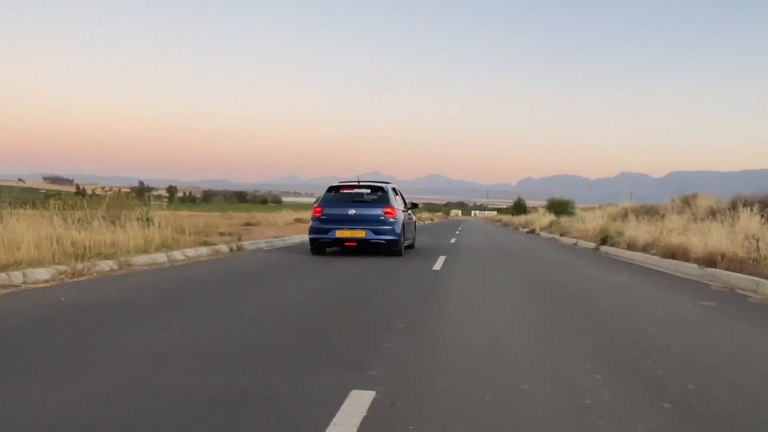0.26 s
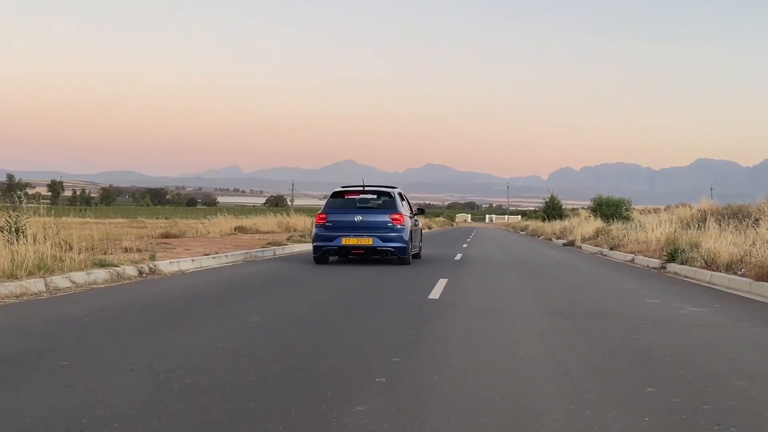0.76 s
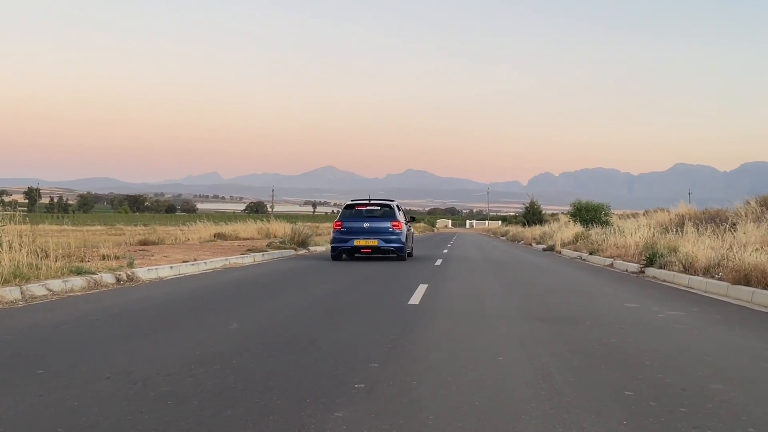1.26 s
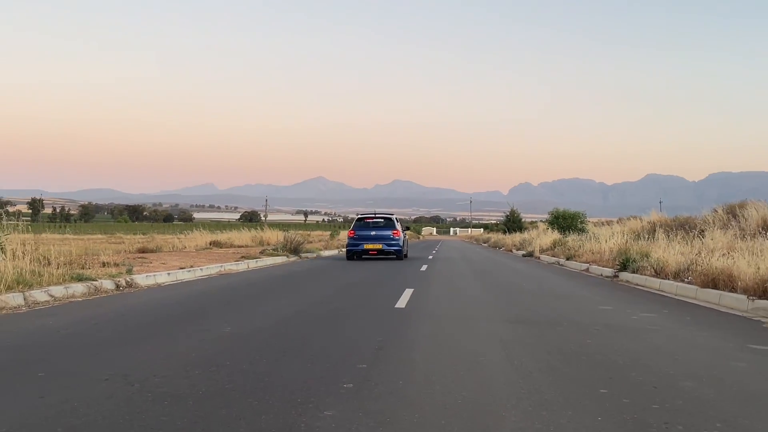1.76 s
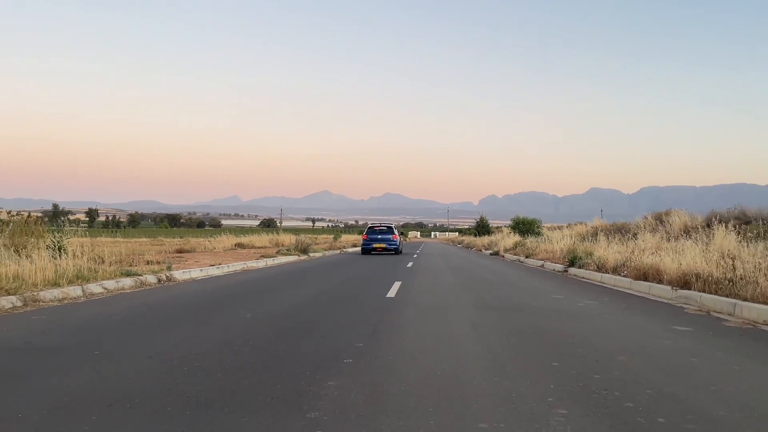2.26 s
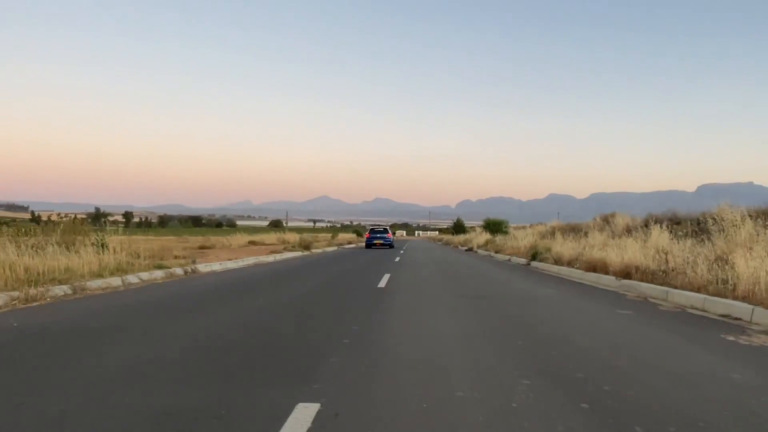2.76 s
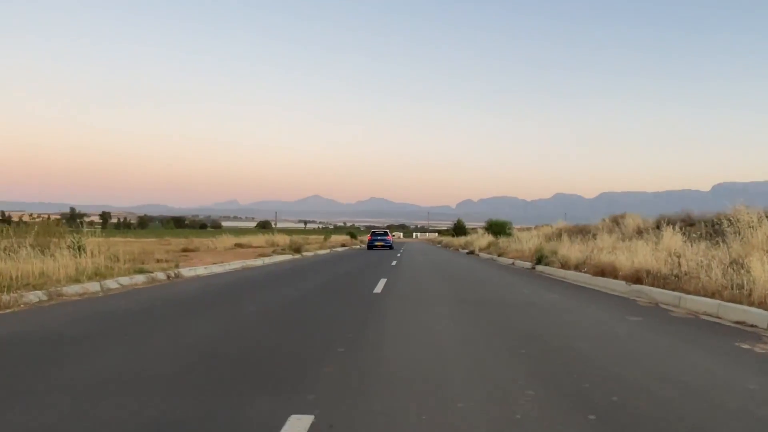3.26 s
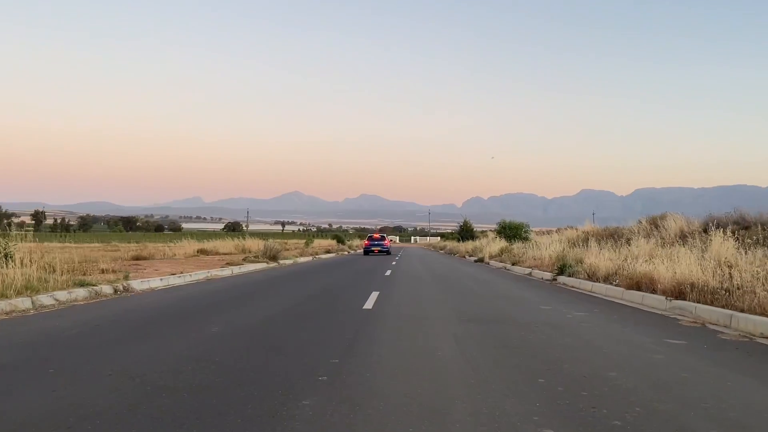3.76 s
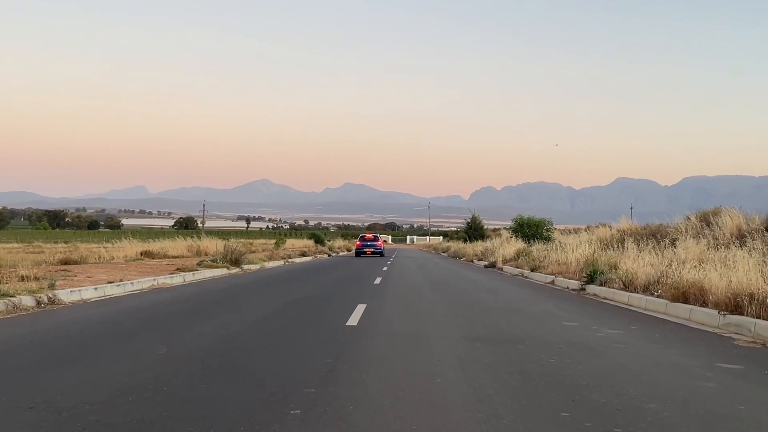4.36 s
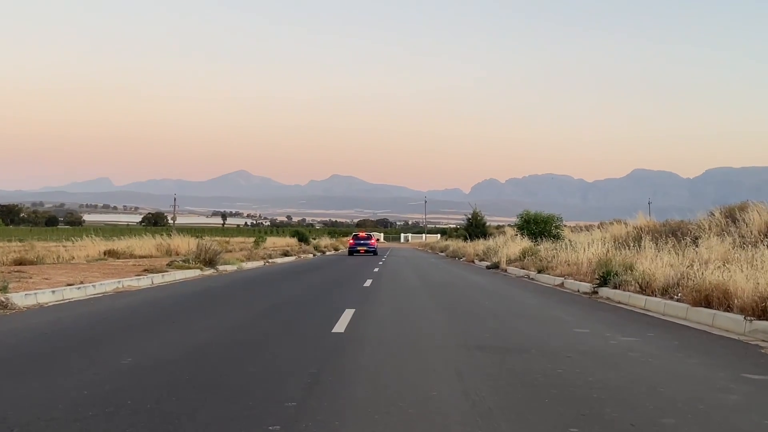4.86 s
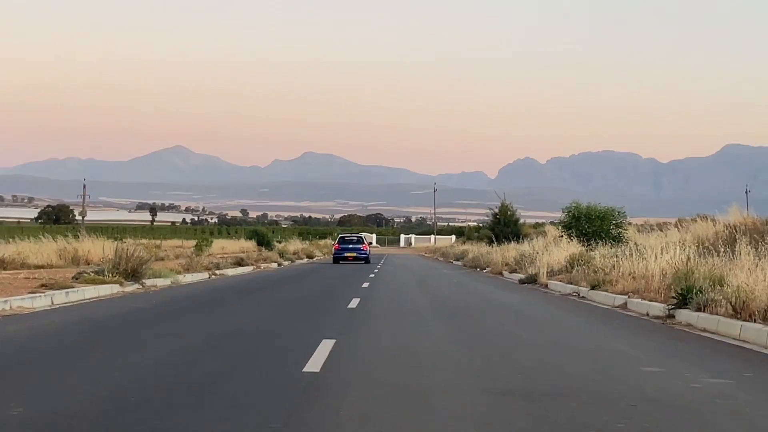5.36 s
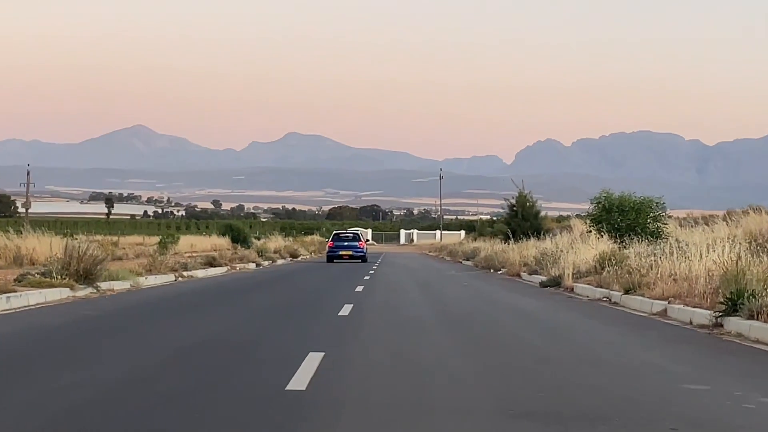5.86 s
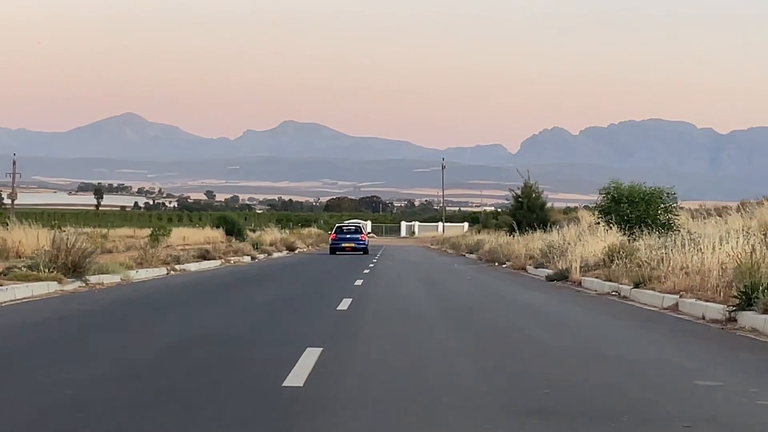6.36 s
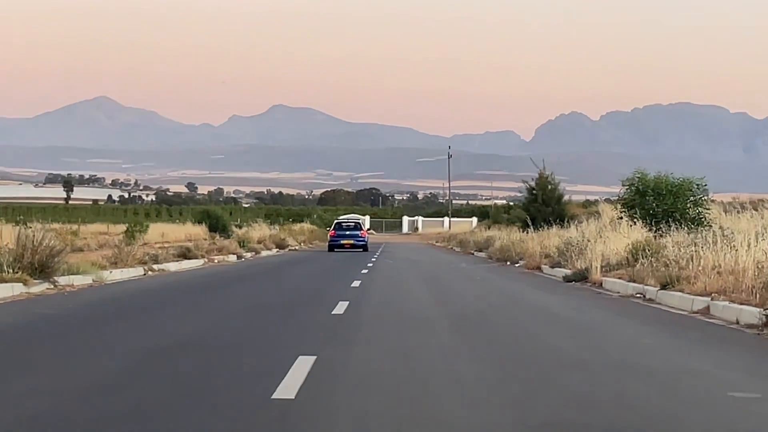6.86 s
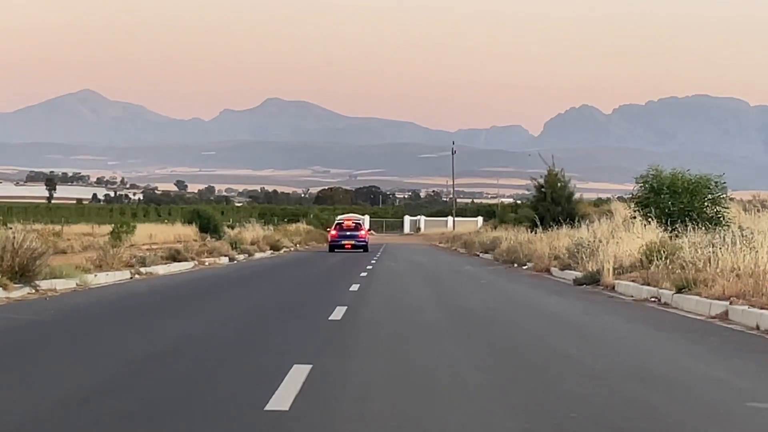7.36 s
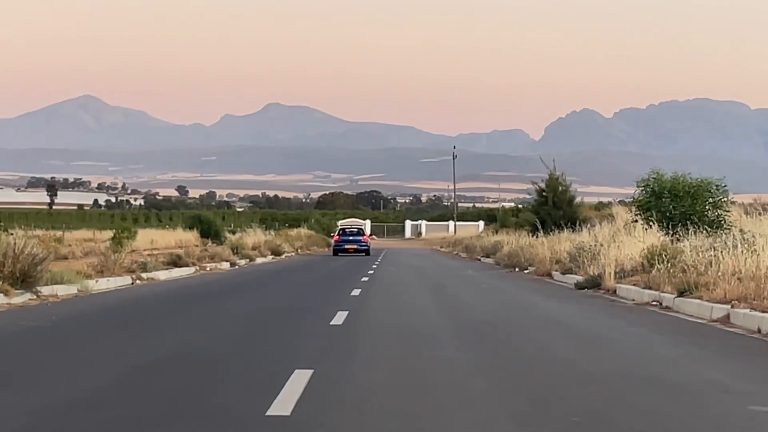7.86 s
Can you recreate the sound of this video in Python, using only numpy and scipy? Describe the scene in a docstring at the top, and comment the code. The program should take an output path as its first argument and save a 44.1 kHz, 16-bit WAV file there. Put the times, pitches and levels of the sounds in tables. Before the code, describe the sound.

Loud buzzy three-cylinder exhaust accelerates through two cracking gear changes, fades off throttle, blips once, and pops irregularly on an open country road.

```python
"""The open exhaust of a small three-cylinder turbo car pulling away along an empty country road.
Every firing booms as low sines, barks as pulses ringing the pipe and rasps as noisy cracks.
Ignition cuts at the upshifts leave lone bangs; off the throttle unburnt fuel pops in the pipe.
Filtered noise makes the tyre roar and rumble underneath, and the verges return thin echoes.
A microphone with two ports hears it all, with a little hiss of its own."""
import sys
import numpy as np
from scipy import signal
from scipy.fft import rfft, irfft, next_fast_len
from scipy.io import wavfile
from scipy.ndimage import uniform_filter1d

SR = 44100
rng = np.random.default_rng(int(sys.argv[2]) if len(sys.argv) > 2 else 0)


def output_pcm(signal):
    """Save a mono or channel-first signal as 16-bit PCM at the path in sys.argv[1].

    Samples are clipped to [-1, 1] before scaling.
    """
    pcm = np.clip(np.atleast_2d(signal).T, -1, 1) * 32767
    wavfile.write(sys.argv[1], SR, np.round(pcm).astype(np.int16))


N = 358091

# bangs in the exhaust, relative levels: t/s, bark/dB, thump/dB, crack/dB
BANGS = [(0.085, -8, -9.5, -31.5), (0.119, -10.5, -11, -33.5), (0.159, -14.5, -12.5, -39),
         (0.196, -19, -16.5, -47), (.237, -18.5, -13, -51), (0.279, -8.5, -8.5, -34),
         (2.011, -6.5, -10.5, -26.5), (2.05, -18.5, -14, -45), (2.092, -6, -11, -29),
         (3.594, -38, -25, -78), (3.655, -33, -26, -78), (3.715, -29, -26.5, -81), (3.752, -31, -24.5, -74),
         (3.804, -31, -26, -75), (3.867, -28, -22, -68), (3.885, -32, -20, -69), (3.952, -32, -23.5, -75),
         (4.018, -23.5, -20, -44.5), (4.05, -25.5, -20.5, -48.5), (4.159, -42.5, -30, -61),
         (4.252, -18, -19, -30), (4.269, -23.5, -17.5, -33.5), (4.454, -18.5, -16.5, -29.5),
         (4.469, -23, -29, -51), (4.489, -28, -24.5, -42), (4.659, -22, -20, -54.5), (4.674, -25, -31, -75),
         (4.691, -26, -20.5, -50.5), (4.829, -18, -17.5, -36), (4.864, -19.5, -19.5, -34.5),
         (4.969, -23, -16, -54), (4.988, -37, -35, -39.5), (5.003, -20, -18.5, -39.5),
         (5.16, -22.5, -17.5, -39), (5.176, -20, -18, -37), (5.193, -16.5, -24, -29.5),
         (5.325, -32.5, -22, -61), (5.408, -20, -21.5, -51), (5.441, -26, -30, -77), (5.478, -29, -19, -68),
         (5.643, -28.5, -18, -51.5), (5.656, -22.5, -20, -56), (5.671, -37, -21, -87),
         (5.832, -17, -17, -32), (5.866, -21, -22.5, -38), (6.533, -11, -17, -35.5),
         (6.569, -18, -17.5, -48), (6.609, -21, -21.5, -69), (6.643, -25.5, -20, -74),
         (6.719, -21.5, -16, -42), (6.728, -15.5, -31, -31.5), (6.742, -46, -32, -40),
         (6.77, -28.5, -18.5, -50), (6.828, -22, -22.5, -38), (6.837, -17.5, -20, -36),
         (6.878, -22, -16, -44), (6.887, -27, -28.5, -47), (6.975, -21.5, -16, -44),
         (6.986, -20, -33, -36.5), (7.011, -20, -25, -42), (7.034, -23, -22, -37),
         (7.095, -17.5, -19.5, -39), (7.154, -18.5, -15.5, -32.5), (7.181, -25, -41, -42),
         (7.203, -22.5, -24, -47.5), (7.331, -11, -13, -35.5), (7.338, -22, -27, -44),
         (7.389, -19.5, -24, -43), (7.5, -13.5, -19.5, -30.5), (7.51, -18, -21, -37.5),
         (7.527, -50, -29.5, -65), (7.563, -20.5, -18, -45), (7.649, -14, -53, -30),
         (7.66, -20.5, -16.5, -53), (7.673, -25.5, -22, -36), (7.688, -17.5, -24.5, -58),
         (7.714, -31.5, -41, -61), (7.824, -17, -18, -34), (7.847, -25, -17.5, -40), (7.874, -21, -44, -44),
         (7.962, -14, -18, -32), (7.975, -13.5, -17, -35.5), (7.986, -26, -23, -33.5),
         (8.088, -18.5, -16.5, -50)]
# throttle: t/s, coasting share/0-1, share of the loaded pipe sound/0-1
THROTTLE = [(0, 0, 1), (2.2, 0, 1), (2.5, 0, .7), (2.75, 0, .5), (2.95, 0, 0), (3.55, 0, 0), (3.61, 1, 0),
            (6.0, 1, 0), (6.07, 0, 0), (6.36, 0, .1), (6.42, 0, .7), (6.5, 0, .7), (6.54, 1, 0),
            (8.12, 1, 0)]


def from_db(db):
    """Decibels to gain."""
    return 10 ** (np.asarray(db) / 20)


def rms_one(x):
    """Scale to rms 1."""
    return x / np.sqrt(np.mean(x ** 2) + 1e-20)


def in_time(rows):
    """Columns of a time curve at every sample."""
    s, *columns = np.transpose(sorted(map(tuple, rows)))
    return [np.interp(np.arange(N) / SR, s, c) for c in columns]


def at_hz(points, hz):
    """A spectrum read on a log-frequency axis."""
    f, v = np.transpose(points)
    return np.interp(np.log(hz + 1), np.log(f + 1), v)


def coloured(x, spectrum):
    """Shape a signal by a spectrum in dB."""
    size = next_fast_len(N)
    gain = from_db(at_hz(spectrum, np.fft.rfftfreq(size, 1 / SR)))
    return irfft(rfft(x, size) * gain, size)[..., :N]


def band(x, low_hz, high_hz, order=3):
    """Band-pass."""
    sos = signal.butter(order, [low_hz, high_hz], "band", fs=SR, output="sos")
    return signal.sosfilt(sos, x)


def decaying(clicks, decay_s):
    """Each click becomes an exponential tail, down to 1/e after decay_s."""
    return signal.lfilter([1], [1, -np.exp(-1 / (decay_s * SR))], clicks + 1e-18)


def drift(rate):
    """Slow smoothed wander around zero, from random points at a rate per second."""
    slow = rng.standard_normal(int(N / SR * rate) + 2)
    line = np.interp(np.arange(N) * rate / SR, np.arange(len(slow)), slow)
    return uniform_filter1d(line, int(SR / rate / 2))


def road():
    """Tyre and air roar over low rumble: filtered noise, partly unlike on the two sides."""
    # loudness of the roar, relative: t/s, level/dB
    roar_level = [(0, -53.5), (.7, -42.5), (1.1, -48), (1.9, -45), (2.1, -48), (2.7, -55), (2.87, -61.5),
                  (3.3, -59.5), (5.95, -56), (6.67, -53.5), (8.12, -55)]
    # spectrum of tyres and air: f/Hz, level/dB
    roar_spectrum = [(470, 5), (800, -2), (995, -6.5), (1460, -11), (2190, -20.5), (3640, -22.5),
                     (4020, -29.5), (7000, -32), (9100, -84.5), (15400, -120)]
    # spectrum of the rumble: f/Hz, level/dB
    rumble_spectrum = [(20, -5.5), (40, 9.5), (90, 22), (200, 6.5), (400, -6.5), (900, -32.5)]
    level_db, = in_time(roar_level)
    mid, side, low, low_side = rng.standard_normal((4, N))
    sides = np.array([[1], [-1]])
    flicker_db = 1.3 * drift(9.)
    roar = rms_one(band(coloured(mid + 0.21 * sides * side, roar_spectrum), 210, 6500))
    lumps_db = 2.5 * drift(6.)
    rumble = rms_one(band(coloured(low + 0.14 * sides * low_side, rumble_spectrum), 8.2, 1500))
    return from_db(level_db + 7 + flicker_db) * roar + from_db(-42.5 + lumps_db) * rumble


def verges(x):
    """A few thin echoes off the verges, at different distances on each side."""
    # echoes: left delay t/s, right delay t/s, level/dB
    echoes = [(.0021, 0.0046, -13.5), (.011, 0.0056, -22), (0.024, 0.036, -24.5), (.037, 0.061, -39.5)]
    thin = band(x, 700, 20000, order=2)
    out = np.zeros((2, N))
    for left_s, right_s, level_db in echoes:
        for side, lag in enumerate((int(left_s * SR), int(right_s * SR))):
            out[side, lag:] += from_db(level_db) * thin[:N - lag]
    return out


def modes(clicks, table, sign=1):
    """Clicks ring a set of modes; sign -1 sets neighbours against each other, so the ring swells late."""
    out = 0
    for k, (hz, level_db, t60) in enumerate(table):
        r = from_db(-60 / (t60 * SR))
        w = 2 * np.pi * hz / SR
        strike = from_db(level_db) * np.sin(w) * sign ** k
        out = out + signal.lfilter([0, strike], [1, -2 * r * np.cos(w), r * r], clicks + 1e-18)
    return out / np.sum(from_db(np.array(table)[:, 1]))


def bark(low, high):
    """Pressure pulses ring the pipe; load changes its modes, the silencer trims both ends."""
    # pipe modes on light throttle, then under load: f/Hz, relative level/dB, t60/s
    low_light = [(380, 4.4, 0.067), (420, 0, 0.09)]
    high_light = [(570.7, -4, 0.31), (634.4, 19.5, 0.04), (702, -7, 0.42), (905, -26, 0.016)]
    low_loaded = [(287.5, 8, 0.056), (338.3, 11, 0.049), (367, -6.5, 0.091), (470.5, 0.5, 0.069)]
    high_loaded = [(547, -2, 0.061), (631, 5, 0.045), (730, 9.5, 0.032), (878, -3, 0.033),
                   (951, -12, 0.034), (1090, -20, 0.092), (1553, -5, 0.028)]
    load = in_time(THROTTLE)[1]
    light = modes(low * (1 - load), low_light) + modes(high * (1 - load), high_light)
    loaded = modes(low * load, low_loaded) + modes(high * load, high_loaded)
    return band(light, 260, 1025, order=4) + band(loaded, 175, 1390)


def cracks(clicks, tail_db, spectrum):
    """Each click is a shock front with a short burst of noise and a faint, duller tail to both sides."""
    burst = decaying(clicks, 0.0016) * rng.standard_normal(N)
    scattered = rng.standard_normal(N) + 0.42 * rng.standard_normal((2, N))
    tail = decaying(clicks, 0.011) * scattered
    tail = signal.sosfilt(signal.butter(2, 6000, fs=SR, output="sos"), tail)
    return coloured(0.27 * clicks + burst + from_db(tail_db) * tail, spectrum)


def edge(clicks, level_db):
    """Strong fronts steepen: their top treble grows with the square of their strength."""
    spit = decaying(clicks ** 2, 0.0015) * rng.standard_normal(N)
    return from_db(level_db) * band(spit, 8500, 15000, order=2)


def thump(clicks):
    """The blunt push of a bang rings the low modes of the long pipe."""
    # low modes on light throttle, then under load: f/Hz, relative level/dB, t60/s
    light_modes = [(67.6, -8.5, 0.53), (102.4, -0.5, 0.16), (149.9, 1, 0.12), (188, 1, 0.062)]
    loaded_modes = [(104, -5, 0.17), (173, 6.5, 0.044)]
    load = in_time(THROTTLE)[1]
    soft = signal.lfilter([.04], [1, -.96], clicks)
    light = modes(soft * (1 - load), light_modes, sign=-1)
    loaded = modes(soft * load, loaded_modes, sign=-1)
    return band(from_db(11.0) * light + from_db(6.5) * loaded, 33, 640, order=2)


def pops():
    """Lone explosions ring the same pipe, with a late thump and a crack."""
    # crack of a lone bang: f/Hz, level/dB
    crack_spectrum = [(800, 11), (1400, 8.5), (2300, -4), (3500, 0), (4800, 3.5), (6500, -3), (8500, -5.5),
                      (11500, -19), (14000, -29)]
    s, bark_db, thump_db, crack_db = np.transpose(BANGS)
    low_db = -17 + 0.69 * bark_db     # the low bark follows part of the bark's swing
    levels_db = bark_db, low_db, thump_db, crack_db
    lags_s = .0003, .0012, .0043, 0     # the low push leaves the long pipe last
    high, low, push, crack = np.zeros((4, N))
    for clicks, db, lag_s in zip((high, low, push, crack), levels_db, lags_s):
        clicks[np.minimum(((s + lag_s) * SR).astype(int), N - 1)] = from_db(db)
    barks = bark(from_db(10.0) * low, from_db(2.5) * high)
    snaps = from_db(10.5) * cracks(crack, -18.5, crack_spectrum)
    return barks + thump(push) + snaps + edge(crack, 30.5)


def ignition_db():
    """Level lost while the spark is cut during the upshifts."""
    # ignition cuts: start t/s, end t/s
    cuts = [(0.065, .28), (1.985, 2.094)]
    t, edge_s = np.arange(N) / SR, .012
    return -25 * sum(np.interp(t, (s, s + edge_s, end, end + edge_s), (0, 1, 1, 0)) for s, end in cuts)


def aftermath(boom_db):
    """Swells and fades after each bang, by its strength against the boom."""
    s, bark_db = np.transpose(BANGS)[:2]
    clicks = np.zeros(N)
    r = np.exp(-1 / (0.0094 * SR))     # peaks 9.4 ms after the bang
    clicks[(s * SR).astype(int)] = from_db(bark_db)
    return signal.lfilter([np.e * (1 - r)], [1, -2 * r, r * r], clicks / from_db(boom_db) + 1e-18)


def boom(per_s, turns, level_db, after, scatter_db):
    """Orders 1 to 3 of the firing rate as sines; uneven burning makes them waver in level and timing."""
    # strength of an order under load, on light throttle and coasting: f/Hz, level/dB
    loaded = [(58, -10.5), (66, -6.5), (80, 0), (120, -1.5), (165, 0), (190, -2.5), (250, -11)]
    light = [(58, -4.5), (72, -6.5), (120, -3.5), (130, -3), (150, -4.5), (180, -1.5), (230, -14)]
    coasting = [(56, -4.5), (82, -3.5), (116, -6), (160, -18), (176, -13), (245, -36.5)]
    # lag of each order behind the firing: t/s
    lags_s = [.022, .00875, .0048]
    # turn of each order: part of its own cycle
    order_turns = [-.18, .115, -.14]
    coast, load = in_time(THROTTLE)
    out = 0
    for order, lag_s, turn in zip((1, 2, 3), lags_s, order_turns):
        hz = order * per_s
        db = level_db + load * at_hz(loaded, hz) + coast * at_hz(coasting, hz)
        db = db + (1 - load - coast) * at_hz(light, hz)
        if order == 1:     # the first order falters after a bang while coasting
            db = db - 20 * np.log10(1 + 1.33 * after)
        gain = np.sqrt(2) * from_db(db + scatter_db * drift(30.))
        phase = 2 * np.pi * (order * (turns - per_s * lag_s) - turn)
        out = out + gain * np.sin(phase + .2 * scatter_db * drift(14.))
    return out


def rasp(fired, cylinder_db, level_db):
    """Gas hiss that steepens into cracks, one per firing, as the rasp grows louder."""
    # crack at the tailpipe: f/Hz, level/dB
    crack_spectrum = [(800, 13), (1400, -5.5), (2300, -9), (3500, -5), (4800, 0), (6500, -3), (8500, -8),
                      (11500, -18.5), (14000, -23.5)]
    # rasp level where cracks begin to replace hiss, and where they have: level/dB
    shock_range = (-68, -56)
    load = in_time(THROTTLE)[1]
    uneven = fired * from_db(cylinder_db * load ** 2 + 1.5 * rng.standard_normal(N))
    cracking = rms_one(cracks(uneven, -16, crack_spectrum))
    hiss = rms_one(band(rng.standard_normal(N), 1200, 5200, order=4))
    shock = np.interp(level_db, shock_range, (0, 1))
    mixed = shock * cracking + (1 - shock) * hiss
    return edge(load * uneven * from_db(level_db), 39.5) + from_db(level_db + 8.0) * mixed


def engine():
    """Low orders as sines, one pulse per firing into the pipe modes, a crack on each."""
    # engine speed: t/s, firing rate f/Hz
    speed = [(0, 89), (.066, 88.2), (.28, 70.3), (.4, 65.6), (.5, 62.5), (.64, 61.9), (.84, 66.5),
             (.97, 68.3), (1.45, 75.6), (1.98, 83.1), (2.1, 71), (2.38, 63.3), (2.55, 58.7), (2.71, 60.7),
             (3.66, 59.9), (4.5, 58.55), (5.9, 56.3), (6.07, 57.3), (6.41, 80.2), (6.48, 81.8), (7.2, 81.5),
             (8.12, 79)]
    # relative loudness of the running engine: t/s, boom/dB, bark/dB, rasp/dB
    loudness = [(0, -16.5, -21.5, -41.5), (.07, -17, -28.5, -37.5), (.3, -17.5, -31, -44.5),
                (.42, -19, -31, -52), (.7, -17, -23.5, -35.5), (.84, -15.5, -31.5, -41),
                (.97, -19.5, -47.5, -59), (1.08, -17, -34.5, -52), (1.18, -17, -32, -43),
                (1.36, -17.5, -33.5, -42.5), (1.55, -17.5, -25.5, -37.5), (1.9, -15.5, -28, -40),
                (1.985, -16, -24.5, -27.5), (2.1, -17.5, -27, -35.5), (2.19, -19.5, -35.5, -47.5),
                (2.44, -19.5, -23, -44.5), (2.64, -22, -22.5, -41.5), (2.75, -27, -28, -54.5),
                (2.9, -33.5, -47, -89.5), (3.04, -36.5, -47.5, -81.5), (3.55, -30, -40.5, -95),
                (3.62, -30.5, -48, -86), (3.75, -32, -59, -94), (4.3, -30, -75.5, -74),
                (5.95, -33, -67, -94), (6.02, -35, -53, -94), (6.08, -30.5, -45, -71.5),
                (6.35, -27, -41, -62.5), (6.43, -17.5, -17.5, -34.5), (6.5, -16.5, -21, -32.5),
                (6.508, -22, -48, -57), (6.6, -29, -70, -73), (6.75, -20, -54, -78),
                (8.12, -17.5, -62.5, -85)]
    # relative strength of the three cylinders in firing order: level/dB
    cylinders = [0, -4, -8]
    per_s, = in_time(speed)
    levels_db = np.array(in_time(loudness))
    coast, load = in_time(THROTTLE)
    after = coast * aftermath(levels_db[0])
    boom_db, high_db, rasp_db = levels_db + ignition_db()
    # the low bark lies between boom and bark, weaker without load
    low_db = 0.39 * boom_db + (1 - 0.39) * high_db - 5.5 * (1 - load)
    # the bark flares after a bang while coasting
    high_db = high_db + 20 * np.log10(1 + 3.86 * np.tanh(after))
    scatter_db = .35 + 1.45 * coast     # firings scatter more while coasting
    turns = 1.22 + np.cumsum(per_s) / SR     # firings gone by
    fired = np.diff(np.floor(turns), prepend=1)
    cylinder_db = np.array(cylinders)[turns.astype(int) % 3]
    # the bark takes a small share of the cylinder pattern
    pulse_db = 0.13 * load * cylinder_db + 1.5 * scatter_db * rng.standard_normal(N)
    pulses = fired * from_db(pulse_db)
    # turbulent gas follows each pulse for a few milliseconds
    gas = decaying(pulses, .004) * rng.standard_normal(N)
    # the bark trails the crack by 1 ms
    pulses = np.roll(pulses + (.012 + .015 * scatter_db) * gas, int(.001 * SR))
    barks = bark(-pulses * from_db(low_db + 11.5), -pulses * from_db(high_db + 12.5))
    return boom(per_s, turns, boom_db, after, scatter_db) + barks + rasp(fired, cylinder_db, rasp_db)


def scene():
    """Car, its echoes and the road."""
    car = engine() + pops()
    return car + verges(car.mean(axis=0)) + road()


def record(dry):
    """Two microphone ports differ in phase and level; faint hiss is added and the top is cut."""
    # phase lead of the left port: f/Hz, phase/rad
    port_phase = [(300, 0), (1380, .4), (1810, -.6), (2300, 0), (4910, .5), (6460, -.3), (7150, -1.3),
                  (7840, -2.6), (9650, -4.4), (10500, -5.6), (12400, -6.9), (13500, -8.2)]
    # left minus right: f/Hz, level/dB
    port_balance = [(60, .2), (200, .3), (400, 1.2), (700, 2), (1210, 3), (2200, 1), (4010, .8), (7320, 0),
                    (13300, .4)]
    size = next_fast_len(N)
    hz = np.fft.rfftfreq(size, 1 / SR)
    # each port takes half of the difference
    half = from_db(at_hz(port_balance, hz) / 2) * np.exp(.5j * at_hz(port_phase, hz))
    ports = irfft(rfft(dry, size) * [half, 1 / half], size)[:, :N]
    self_noise = rms_one(band(rng.standard_normal((2, N)), 8000, 13500))
    ports = ports + from_db(-94) * self_noise
    return signal.sosfilt(signal.butter(10, 14000, fs=SR, output="sos"), ports)


dry = scene()
out = record(dry)
output_pcm(out)
```